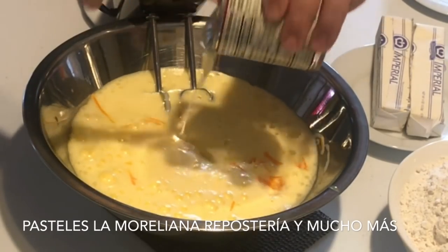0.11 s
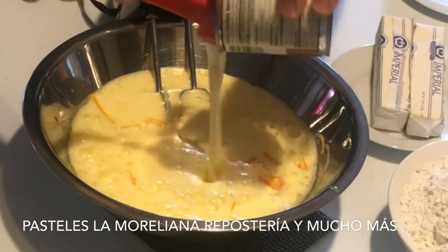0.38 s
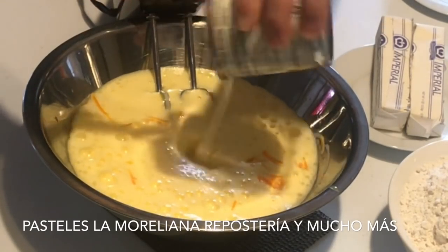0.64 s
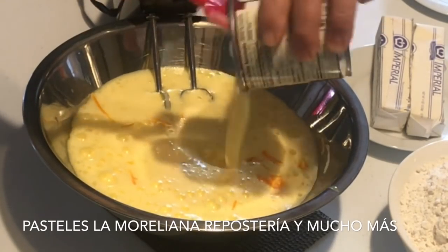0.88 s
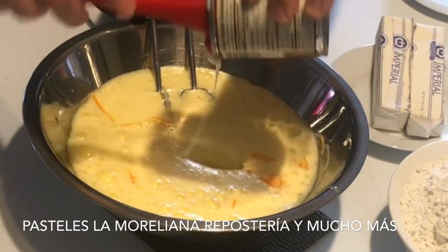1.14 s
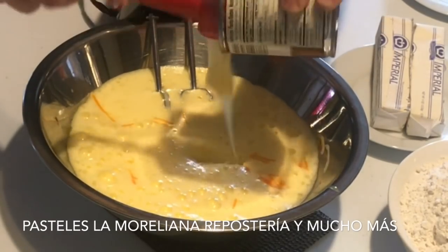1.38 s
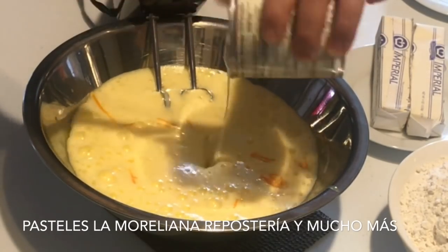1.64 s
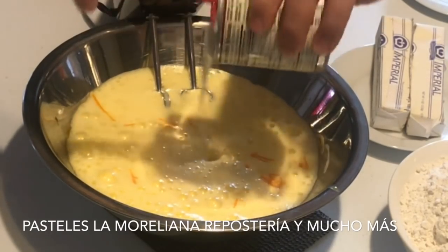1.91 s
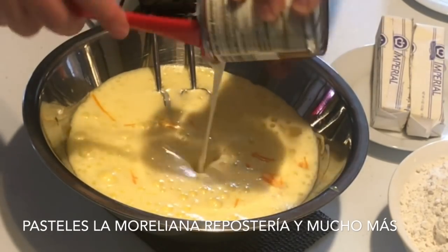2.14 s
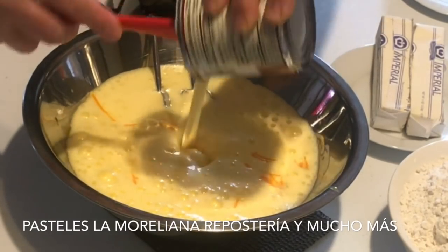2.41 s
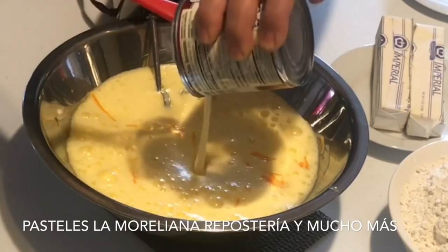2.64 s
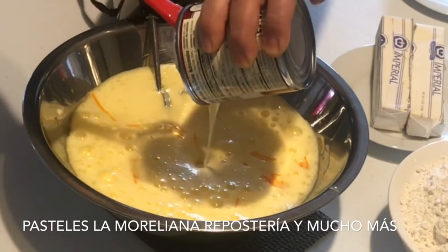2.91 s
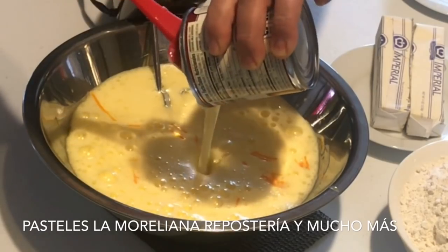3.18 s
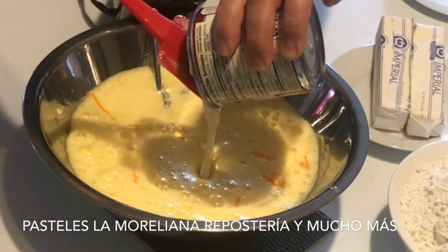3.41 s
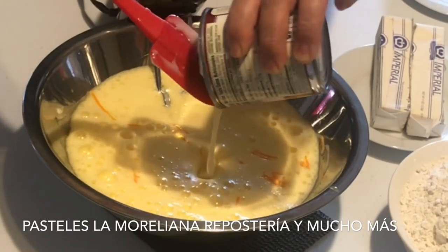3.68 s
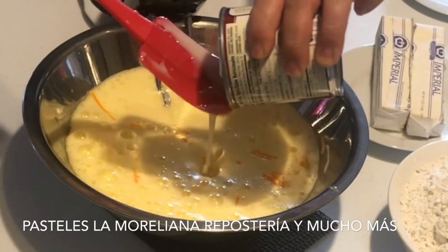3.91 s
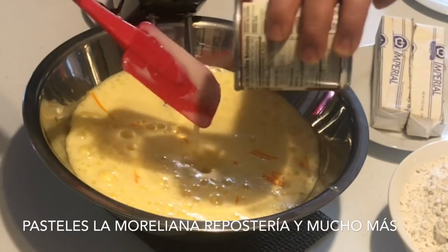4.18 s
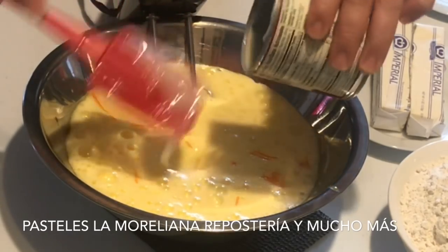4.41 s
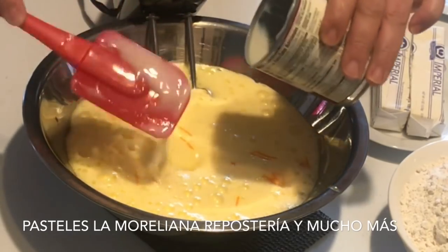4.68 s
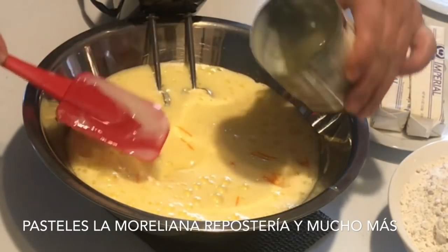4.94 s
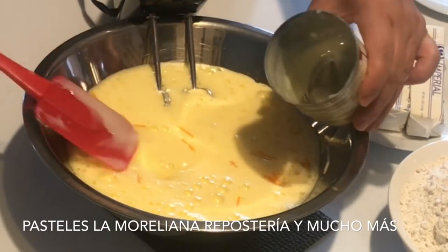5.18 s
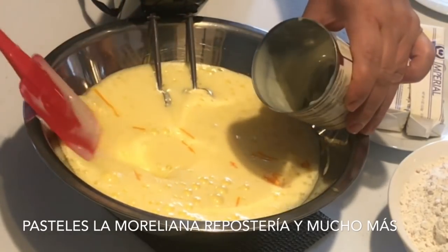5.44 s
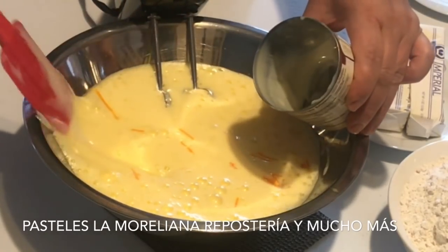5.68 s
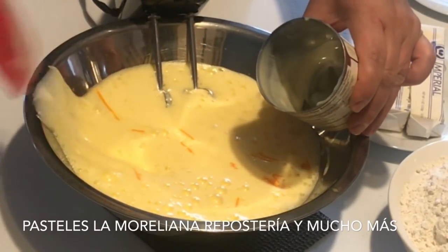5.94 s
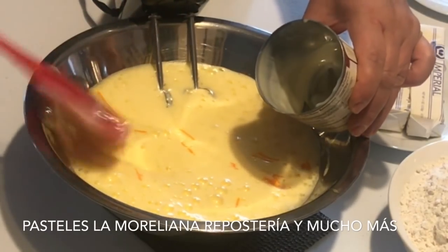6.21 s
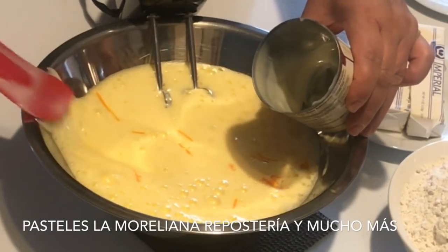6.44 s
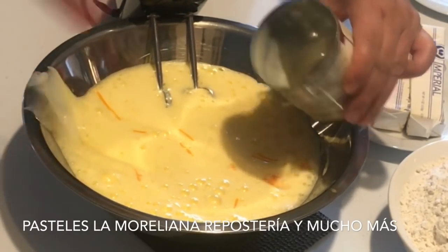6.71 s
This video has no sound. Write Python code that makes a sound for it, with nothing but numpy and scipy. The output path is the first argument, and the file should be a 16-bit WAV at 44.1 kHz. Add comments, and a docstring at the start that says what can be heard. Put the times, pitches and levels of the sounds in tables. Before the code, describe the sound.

Over steady low appliance hum and soft moving air, a rubbery blade rustles and clicks against a can for about three seconds, knocking it lightly. Then sparse faint rubs and a small tap. A sudden bright, hollow tin clank on a heavy filled steel bowl dominates, with a short room tail; a few weak sticky ticks and a low thud follow. Close microphone, indoor kitchen.

```python
"""A kitchen: thick milk runs silently from a can into a steel bowl while a soft spatula scrapes the can out.
Filtered grains make the blade's rustle and noise bursts its sticky ticks. Ringing modes make the knocks
on the can, one of them a hard strike on the bowl's rim, and the thumps of the bowl.
Behind it sines hum for a motor with a stack of overtones and a compressor; shaped noise makes the
moving air and a faint, regular swish."""
import sys
import numpy as np
from scipy import signal
from scipy.fft import rfft, irfft
from scipy.io import wavfile

SR = 44100
rng = np.random.default_rng(int(sys.argv[2]) if len(sys.argv) > 2 else 0)


def voltage_ratio(decibels):
    """Convert decibels (scalar or array-like) to amplitude ratios, 20 dB per decade."""
    exponent = np.asarray(decibels, float) / 20
    return 10 ** exponent


def log_audio(samples):
    """Write samples as a 16-bit WAV file to the path given in sys.argv[1]."""
    # one column per channel
    frames = np.atleast_2d(samples).T
    # limit to full scale, then quantise
    limited = np.clip(frames, -1, 1)
    pcm = np.round(limited * 32767).astype(np.int16)
    wavfile.write(sys.argv[1], SR, pcm)


N = 301100


def rms_one(x):
    """Scale to rms 1."""
    return x / np.sqrt(np.mean(x ** 2) + 1e-20)


def at_hz(points, hz):
    """Read a curve of (f/Hz, value) on a log-frequency axis."""
    columns = np.array(points)
    return np.interp(np.log(hz), np.log(columns[:, 0]), columns[:, 1])


def coloured(x, spectrum):
    """Shape a steady noise by a spectrum, silent beyond its ends; rms 1."""
    hz = np.maximum(np.arange(N // 2 + 1) * SR / N, 1)
    outside = (hz < spectrum[0][0]) | (hz > spectrum[-1][0])
    return rms_one(irfft(rfft(x) * voltage_ratio(at_hz(spectrum, hz)) * ~outside, N))


def drift(rate_hz):
    """Slow random wander of rms 1: low-passed noise, drawn once every 40 samples and joined by lines."""
    r = np.exp(-80 * np.pi * rate_hz / SR)
    noise = rng.standard_normal(N // 40 + 2002)
    slow = signal.lfilter([1], [1, -2 * r, r * r], noise)[2000:]   # skip the filter's start
    return np.interp(np.arange(N) / 40, np.arange(len(slow)), rms_one(slow))


def ring(force, hz, t60, shortest=.003):
    """A damped resonance: a unit click sets a sine of height 1 ringing."""
    r = voltage_ratio(-60 / (max(t60, shortest) * SR))
    w = 2 * np.pi * hz / SR
    return signal.lfilter([0, np.sin(w)], [1, -2 * r * np.cos(w), r * r], force + 1e-18)


def band(x, low_hz, high_hz):
    """Band-pass, its upper edge held below the top of the range."""
    edges = [low_hz, min(high_hz, SR / 2.2)]
    return signal.sosfilt(signal.butter(2, edges, "band", fs=SR, output="sos"), x)


MOTOR_HZ = 15.01
# motor overtones: (multiple of MOTOR_HZ, rms level/dB)
MOTOR_OVERTONES = [(3, -76), (8, -57), (11, -64), (12, -66), (16, -71), (17, -69), (19, -76), (22, -62),
                   (23, -71), (24, -70), (25, -65), (26, -69), (27, -72), (28, -77), (29, -69), (30, -66),
                   (31, -69), (32, -69), (33, -72), (34, -79), (35, -76), (41, -76), (42, -74), (43, -73),
                   (45, -80), (46, -77), (48, -82), (49, -76), (56, -80), (57, -87), (59, -86), (60, -84),
                   (61, -87), (62, -73), (65, -76), (68, -85), (70, -73), (72, -88), (73, -86), (74, -87),
                   (75, -84), (82, -85), (84, -83), (107, -91)]
# other steady tones: (f/Hz, rms level/dB, waver/dB)
STEADY_TONES = [(56.55, -57, .5), (66.3, -63, 2.5), (174.5, -72, 2.5), (523.4, -74, 1.5)]


def hum():
    """Motor and compressor as sines: steady overtones of the motor, other tones wavering in level."""
    t, out = np.arange(N) / SR, 0
    for multiple, db in MOTOR_OVERTONES:
        out = out + voltage_ratio(db) * np.sin(2 * np.pi * (multiple * MOTOR_HZ * t + rng.random()))
    for hz, db, waver_db in STEADY_TONES:
        level = voltage_ratio(db + waver_db * drift(6.6))
        out = out + level * np.sin(2 * np.pi * (hz * t + rng.random()))
    return np.sqrt(2) * out   # levels are rms, sines peak higher


# spectrum of the rushing air: (f/Hz, relative level/dB per Hz)
AIR_SPECTRUM = [(30, -26), (55, -0.5), (90, -0.5), (124, -3), (280, -8.5), (340, -6.5), (461, -9.5),
                (540, -12), (649, -8), (801, -16.5), (937, -20.5), (1250, -15), (1400, -22), (1720, -21.5),
                (3000, -28), (7000, -33.5), (10300, -37), (12500, -34.5), (16000, -36.5)]
# resonances in the air stream: (f/Hz, width/Hz, rms level/dB)
AIR_RESONANCES = [(47.3, 8.6, -65), (815, 47, -80), (950.5, 54, -74), (1228, 76, -84), (1386.4, 40, -71),
                  (1492, 23, -75.5)]


def air():
    """Moving air: a broad rush of noise, barely wandering in level, with a few narrow resonances."""
    rush = voltage_ratio(-54.5 + .5 * drift(2.5)) * coloured(rng.standard_normal(N), AIR_SPECTRUM)
    white = rng.standard_normal(N)
    resonances = 0
    for hz, width, db in AIR_RESONANCES:
        resonances = resonances + voltage_ratio(db) * rms_one(band(white, hz - width / 2, hz + width / 2))
    return rush + resonances


# spectrum of the grains under the blade: (f/Hz, relative level/dB per Hz)
RUSTLE_SPECTRUM = [(880, -6), (1500, -2), (1900, -15.5), (3150, -10.5), (4330, -13), (10300, -31),
                   (13300, -26), (16000, -25)]
# strokes of the blade over the tin: (start t/s, length/s, rubbing rms level/dB, fizz over the rubbing/dB)
BLADE_STROKES = [(0, .12, -66, 1.5), (.14, 0.092, -70, 5.5), (.26, .07, -66, -3), (.43, .15, -69, 6),
                 (0.595, .09, -62, -2.5), (0.713, 0.051, -60, 1), (0.832, 0.031, -59, -4),
                 (0.999, 0.23, -68.5, 3.5), (1.27, 0.096, -68, 3), (1.434, 0.046, -69, 3),
                 (1.526, .1, -67.5, 4), (1.64, 0.11, -72, 3.5), (1.88, 0.22, -72, 4),
                 (2.129, .14, -70, 3.5), (2.3, .1, -77, 4), (2.42, 0.19, -73.5, 5.5),
                 (2.644, 0.14, -64, -3), (2.795, .12, -78, 3), (3.188, 0.38, -73.5, 4),
                 (3.69, .08, -79, 10), (4.348, .07, -78, 8), (4.52, .07, -80, 9), (5.525, 0.17, -71, 3)]


def scrape():
    """Dense uneven grains under the blade: a duller rubbing and a bright fizz of sticky release."""
    press_s, lift_s = 0.021, 0.034   # the blade bites quickly and lets go more slowly
    sizes = voltage_ratio(3.4 * np.minimum(rng.exponential(1, N), 5)) * rng.choice([-1, 1], N)
    grains_per_s = 3000 * voltage_ratio(4.0 * drift(15))
    grains = coloured(sizes * (rng.random(N) < grains_per_s / SR), RUSTLE_SPECTRUM)
    t, rub, fizz = np.arange(N) / SR, 0, 0
    for s, length, db, fizz_db in BLADE_STROKES:
        press = np.clip((t - s) / press_s + .5, 0, 1)   # half pressed at the start time
        contact = press * np.exp(-np.maximum(t - s - length, 0) / lift_s)
        rub = rub + voltage_ratio(db) * contact
        fizz = fizz + voltage_ratio(db + fizz_db) * contact
    return rub * rms_one(band(grains, 2080, 7440)) + fizz * rms_one(band(grains, 6050, 14900))


# spectrum of the swish: (f/Hz, relative level/dB per Hz)
SWISH_SPECTRUM = [(2000, -7), (3500, -3), (5300, -1.5), (7000, -8.5), (11000, -17)]


def swish():
    """Once a turn something brushes: a quick puff of noise that dies away, never quite alike in strength."""
    period_s, start_s = .2657, .002
    turn, phase = np.divmod(np.arange(N) / SR - start_s + period_s, period_s)
    strength = voltage_ratio(rng.normal(0, 2.6, 40))[turn.astype(int)]
    puff = (1 - np.exp(-phase / 0.0099)) * np.exp(-phase / 0.025)
    return voltage_ratio(-61.5) * strength * puff * coloured(rng.standard_normal(N), SWISH_SPECTRUM)


# sticky ticks of the blade:
# (t/s, snap peak level/dB, snap centre f/Hz, snap breadth/octaves, dull pop of the tin peak level/dB)
BLADE_TICKS = [(0.143, -40, 9100, 1.9, -39.5), (0.222, -38, 7400, 2, -49),
               (0.274, -42.5, 3300, 0.83, -40.5), (0.3783, -49, 6400, 1.6, -45),
               (0.434, -42.5, 9200, 1.5, -62), (0.443, -40, 10000, 1.7, -65),
               (0.474, -37.5, 13300, 0.42, -58), (0.541, -58, 6900, 1.3, -65),
               (0.7215, -34.5, 3500, 2.6, -37), (0.8598, -46, 4000, 1.9, -64),
               (1.052, -40.5, 9000, 1.9, -62), (1.144, -52, 4000, 1.5, -45), (1.283, -39.5, 9400, 1.6, -57),
               (1.3097, -42, 7300, 1.7, -53), (1.3684, -49, 7100, 1.8, -65), (1.447, -42.5, 9700, 1.6, -50),
               (1.462, -51, 8400, 1.5, -65), (1.543, -40, 4800, 1.3, -47), (1.8784, -58, 4700, 1.4, -65),
               (1.8988, -40.5, 9600, 1.1, -65), (1.984, -44, 11500, 0.8, -52), (2.137, -52, 4800, 1.2, -51),
               (2.2, -48, 10900, 1.1, -65), (2.318, -56, 8000, 1.6, -56), (2.405, -52, 5400, 1.5, -63),
               (2.4704, -50, 12400, 1.2, -65), (2.5604, -48, 10300, 1.5, -57),
               (5.5454, -51, 5550, 2.1, -62), (5.56, -54, 7200, 1.5, -63), (5.5744, -49, 6300, 1.2, -67),
               (5.605, -50, 6100, 1.2, -58), (6.6707, -50, 2780, 1.5, -36.5), (6.762, -51, 5200, 1.2, -67)]


def ticks():
    """Each tick is a noise burst of a few milliseconds: a bright snap of its own pitch over a dull pop."""
    snap_s, patter_db, patter_s = 0.0017, -12.5, 0.0068   # a snap, then a fainter patter
    out, age = np.zeros(N), np.arange(1500) / SR
    fade = np.exp(-age / snap_s) + voltage_ratio(patter_db) * np.exp(-age / patter_s)
    for s, db, hz, octaves, pop_db in BLADE_TICKS:
        burst = rng.standard_normal(1500) * fade
        half = 2 ** (octaves / 2)
        snap = band(burst, hz / half, hz * half)
        pop = band(burst, 950, 1580)
        tick = voltage_ratio(db) * snap / np.abs(snap).max() + voltage_ratio(pop_db) * pop / np.abs(pop).max()
        at = round(s * SR)
        out[at:at + 1500] += tick[:N - at]
    return out


# knocks on the can: (t/s, crack peak level/dB, crack f/Hz, hollow drive level/dB, hollow centre f/Hz)
CAN_KNOCKS = [(.6015, -37, 3300, -42, 795), (.6022, -25.5, 1290, -29, 763), (.7213, -37, 2340, -51, 800),
              (2.672, -53, 700, -46, 830), (2.6993, -37, 3020, -35.5, 787), (2.7007, -32.5, 590, -46, 764),
              (2.719, -38, 715, -49, 687), (2.73, -42, 704, -47, 714), (2.77, -50, 650, -47, 677),
              (4.068, -53, 900, -41, 807), (5.1766, -4.5, 1920, -16, 806), (5.184, -39, 1700, -19, 801),
              (5.229, -16.5, 4570, -26, 842), (5.2315, -18, 1100, -25.5, 816)]
# air in the can: (share of the hollow centre f, relative level/dB, t60/s)
HOLLOW_MODES = [(0.984, -5, 0.074), (1.017, -5, 0.071)]
# walls of the can, damped by hand and milk: (f/Hz, relative level/dB before chance, t60/s)
WALL_MODES = [(1055, -6, 0.038), (1280, -17, 0.038), (1504, -8.5, 0.066), (1693, -6.5, 0.099),
              (1770, -13, .05), (1853, -6, 0.032), (2030, -20, .05), (2170, -9, 0.055), (2340, -20, 0.02),
              (2490, -12, 0.069), (2640, -18.5, .04), (3020, -10, 0.042), (3300, -16, 0.023),
              (3720, -15, .03), (3960, -13.5, .03), (4280, -24.5, .04), (4520, -24, 0.056),
              (5120, -19, .04), (5440, -6, 0.045), (5630, -1.5, 0.04), (5950, -5, 0.04),
              (6300, -5.5, 0.035)]


def can():
    """A knock rings walls and hollow, duller when its crack is low; the crack swells and dies in a few cycles."""
    out, age = np.zeros(N), np.arange(6000) / SR
    click = 1. * (age == 0)
    for s, crack_db, crack_hz, hollow_db, hollow_hz in CAN_KNOCKS:
        chance = rng.standard_normal(6000)
        contact = signal.sosfilt(signal.butter(2, 2.54 * crack_hz, fs=SR, output="sos"), click)

        walls = 0
        for k, (hz, db, t60) in enumerate(WALL_MODES):
            walls = walls + (-1) ** k * voltage_ratio(db + 2.8 * chance[k]) * ring(contact, hz, t60)
        top_hz = 18100 * 2 ** (0.13 * crack_db)   # gentle knocks ring the walls duller
        walls = signal.sosfilt(signal.butter(4, top_hz, fs=SR, output="sos"), walls)
        # the walls ring with both the push and the crack of a knock
        wall_db = -5 + .65 * hollow_db + 0.44 * crack_db

        breath = band(click, hollow_hz / 1.124, hollow_hz * 1.12)   # the air takes a few cycles to get going
        hollow = sum(voltage_ratio(db) * ring(breath, share * hollow_hz, t60) for share, db, t60 in HOLLOW_MODES)

        crack_t60 = 6.74 / crack_hz   # in cycles of its own pitch
        crack = ring(ring(click, crack_hz, crack_t60, 2e-4), crack_hz, crack_t60, 2e-4)
        crack = voltage_ratio(crack_db) * crack / np.abs(crack).max()

        # hard blows wake the dense upper modes of the tin: a short wash and a shorter spray of treble
        wash_fade = np.exp(-age / 0.0053) + voltage_ratio(-22) * np.exp(-age / 0.046)
        wash = voltage_ratio(-12) * band(chance * wash_fade, 3800, 6250)
        spray = voltage_ratio(-15.0) * band(chance * np.exp(-age / 0.00128), 5000, 13000)
        upper = voltage_ratio(1.47 * crack_db) * (wash + spray)

        # a broad slap around every crack
        slap = band(chance[::-1] * np.exp(-age / .0012), max(crack_hz / 2.66, 450), crack_hz * 1.5)
        slap = voltage_ratio(-14 + .68 * crack_db) * slap / np.abs(slap).max()

        at = round(s * SR)
        out[at:at + 6000] += slap + upper + voltage_ratio(wall_db) * walls + voltage_ratio(hollow_db) * hollow - crack
    return out


# thumps on the bowl: (t/s, push strength level/dB, push length/s)
BOWL_THUMPS = [(5.178, -21, 0.0047), (5.186, -25, 0.056), (5.235, -25, 0.053), (6.344, -22.5, 0.044),
               (6.685, -38, .025)]
# low modes of the filled bowl: (f/Hz, relative level/dB, t60/s)
BOWL_MODES = [(141, -4.5, 0.14), (221.4, -2, 0.073), (314, 2, 0.086)]


def bowl():
    """A soft push on the filled bowl sets its damped low modes going."""
    force = np.zeros(N)
    for s, db, length in BOWL_THUMPS:
        push = np.hanning(round(length * SR) + 3)
        # the wall yields and springs back at its lowest mode
        push = push * np.sin(2 * np.pi * BOWL_MODES[0][0] * np.arange(len(push)) / SR + 1)
        force[round(s * SR):][:len(push)] += voltage_ratio(db) * push / np.abs(push).sum()
    return sum(voltage_ratio(db) * ring(force, hz, t60) for hz, db, t60 in BOWL_MODES)


# reverberation of the kitchen: (f/Hz, t60/s)
ROOM_DECAY = [(150, 0.69), (800, 0.46), (3000, 0.52), (6000, 0.45), (12000, 0.36)]


def kitchen(x):
    """Reverberation: octave bands of noise, each dying at its own rate."""
    age = np.arange(SR // 2) / SR
    white = rng.standard_normal((2, len(age)))
    tail = 0
    for k, low in enumerate(100 * 2. ** np.arange(8)):
        t60 = at_hz(ROOM_DECAY, np.sqrt(2) * low)
        tail = tail + band(white[k % 2], low, 2 * low) * voltage_ratio(-60 * age / t60)   # neighbours unrelated
    tail = tail * np.clip((age - .003) / 0.0086, 0, 1)   # short gap, then the room fills
    return signal.fftconvolve(x, tail / np.sqrt(np.sum(tail ** 2)))[:N]


def scene():
    """Hands close to the microphone, hum all around; thumps come through the table and barely stir the room."""
    near, thumps = ticks() + can(), bowl()
    room = voltage_ratio(-10.0) * kitchen(near + voltage_ratio(-4.5) * thumps)
    mix = hum() + air() + scrape() + swish() + near + thumps + room
    return mix[None]


def low_pass(x):
    """Removes everything above the highest recorded frequency."""
    return signal.sosfilt(signal.butter(12, 15900, fs=SR, output="sos"), x)


def record(dry):
    """The microphone drops the deepest bass, below 34 Hz."""
    mix = signal.sosfilt(signal.butter(4, 34, "high", fs=SR, output="sos"), dry)
    return low_pass(mix)


dry = scene()
out = record(dry)
log_audio(out)
```